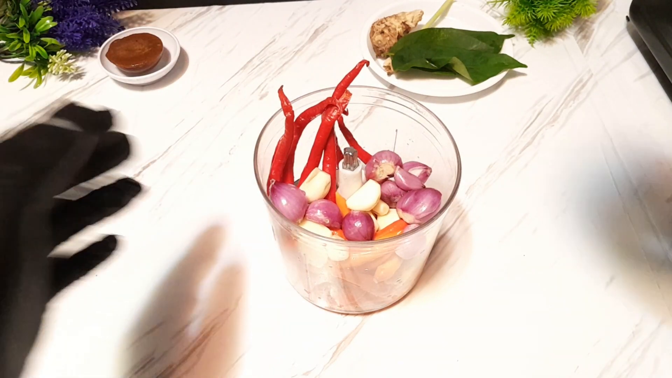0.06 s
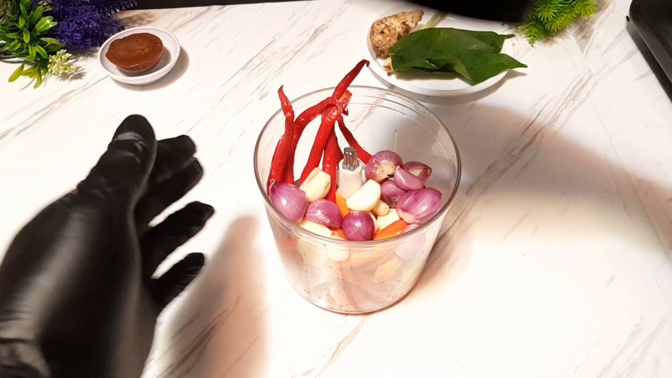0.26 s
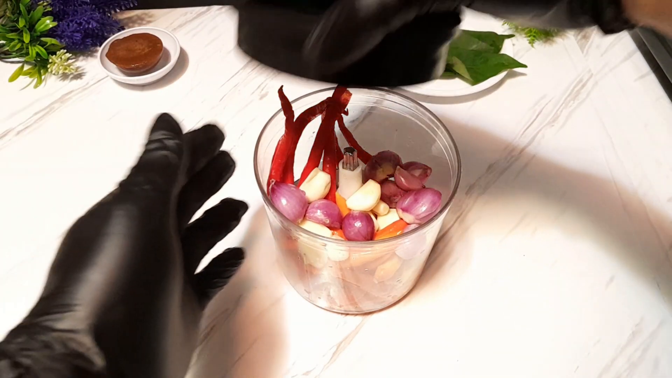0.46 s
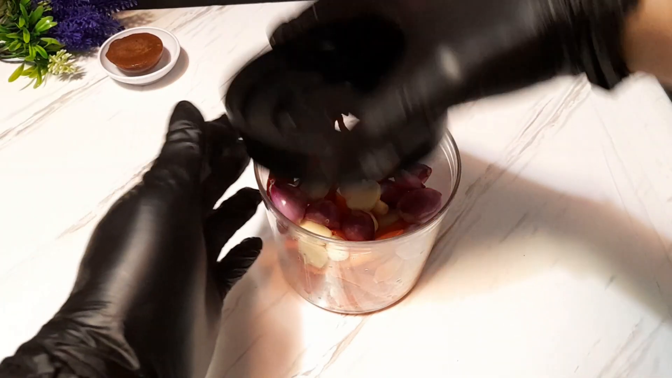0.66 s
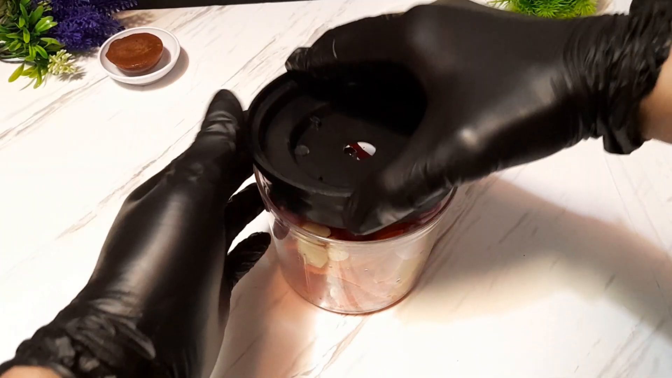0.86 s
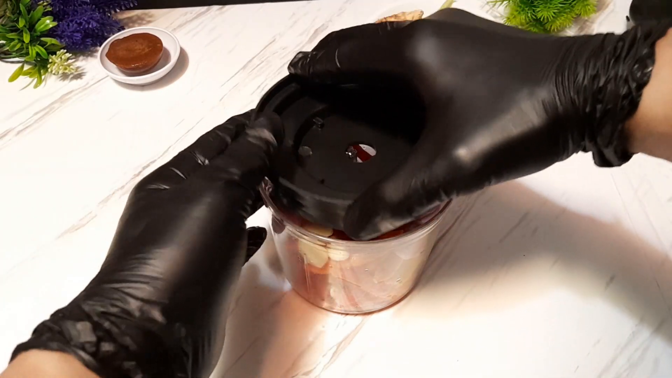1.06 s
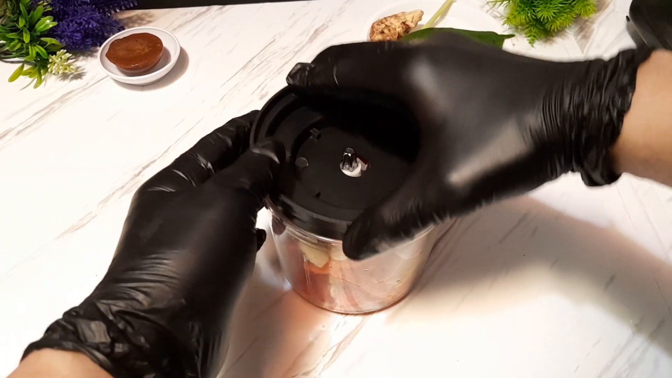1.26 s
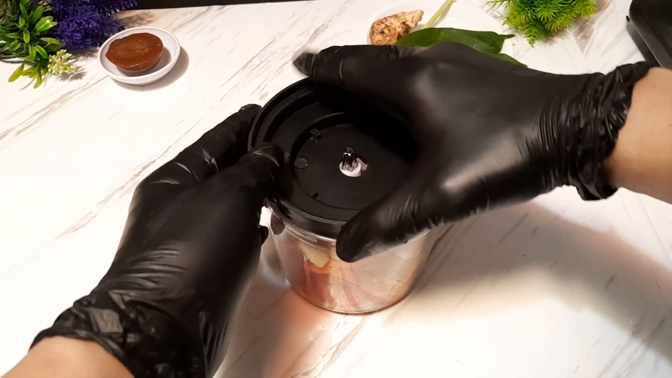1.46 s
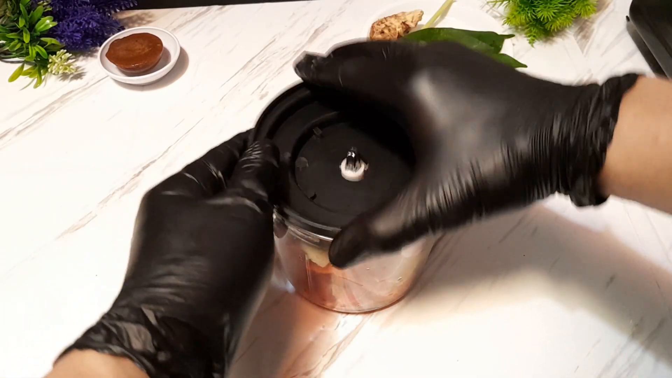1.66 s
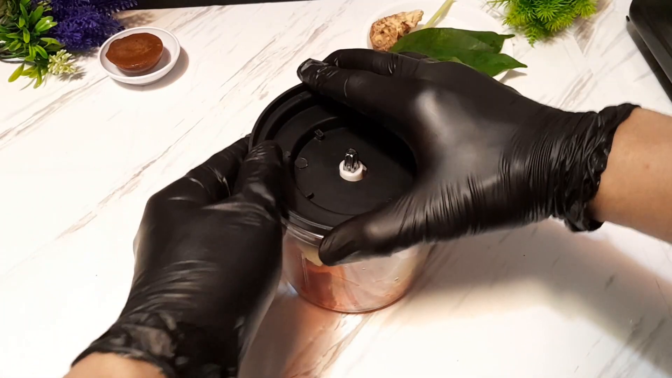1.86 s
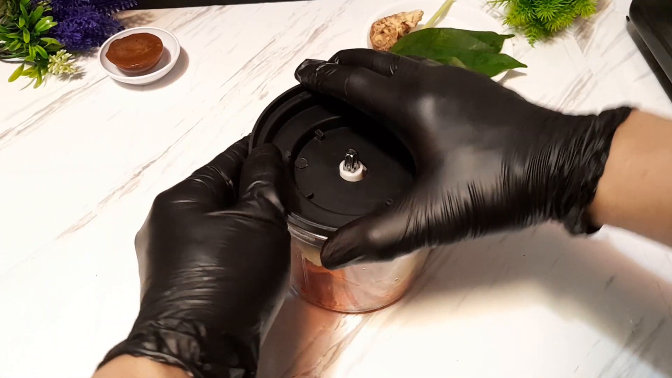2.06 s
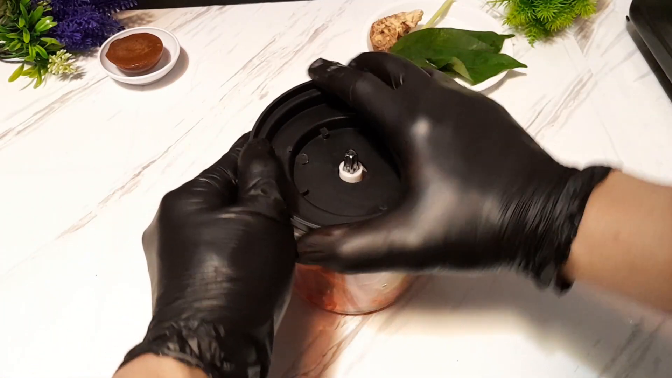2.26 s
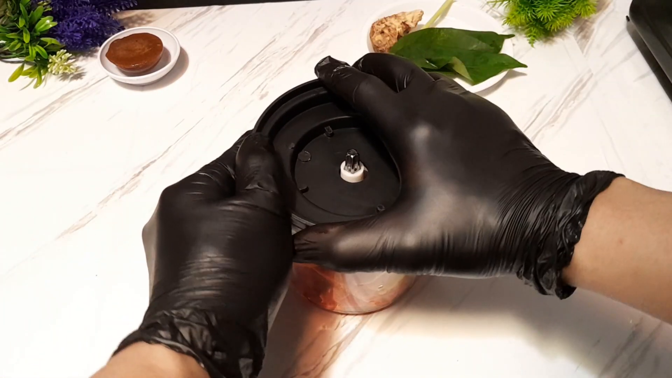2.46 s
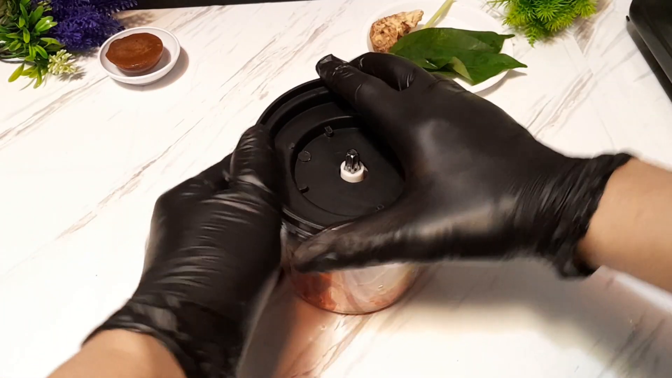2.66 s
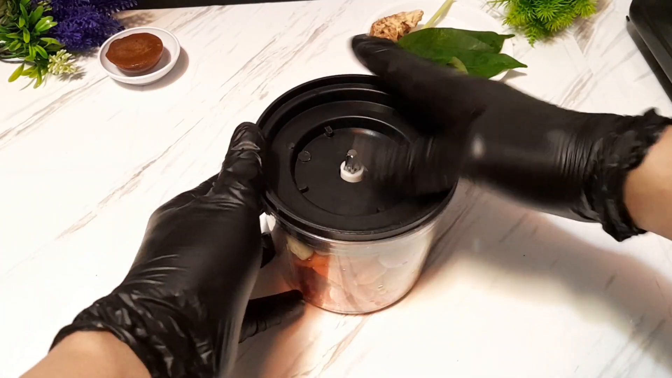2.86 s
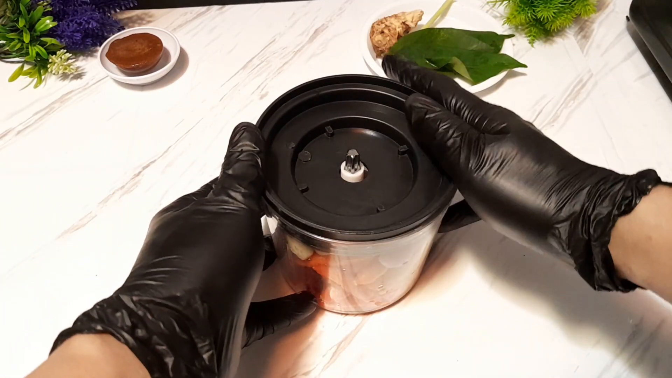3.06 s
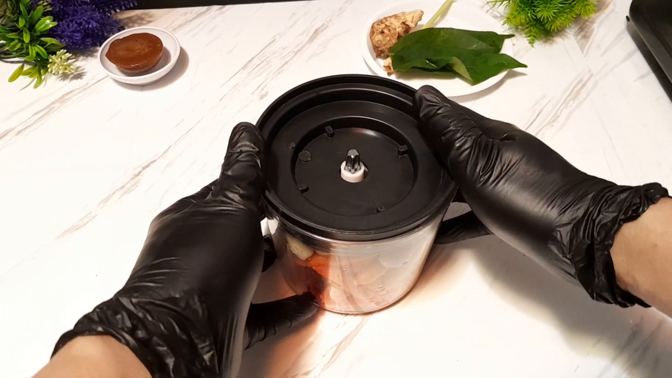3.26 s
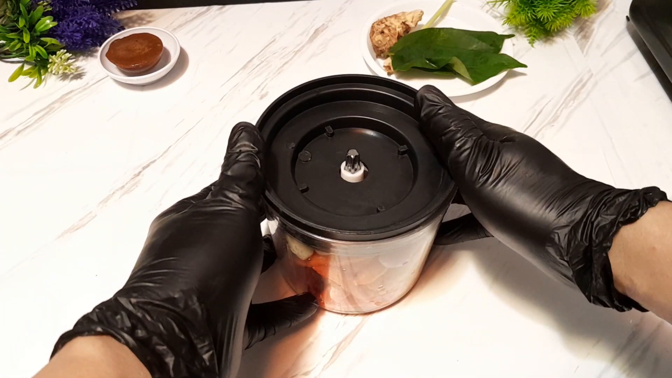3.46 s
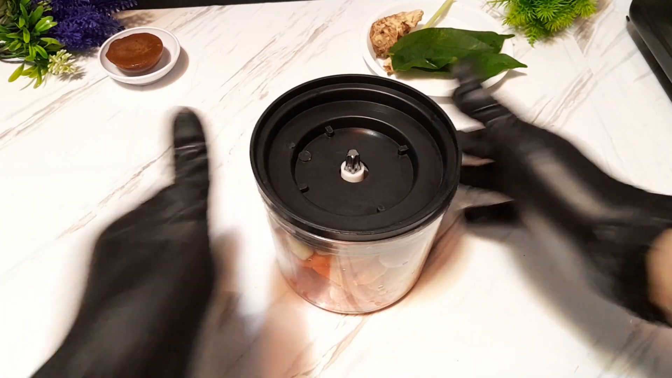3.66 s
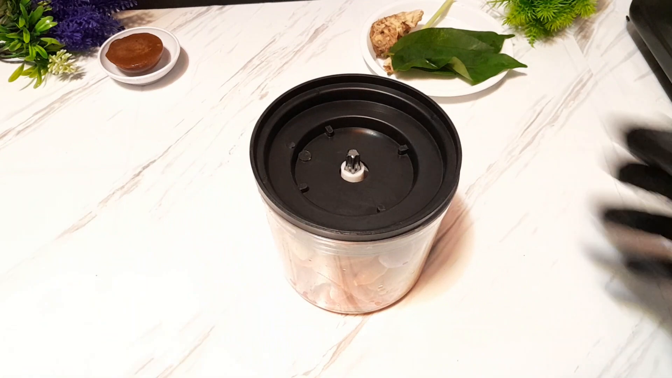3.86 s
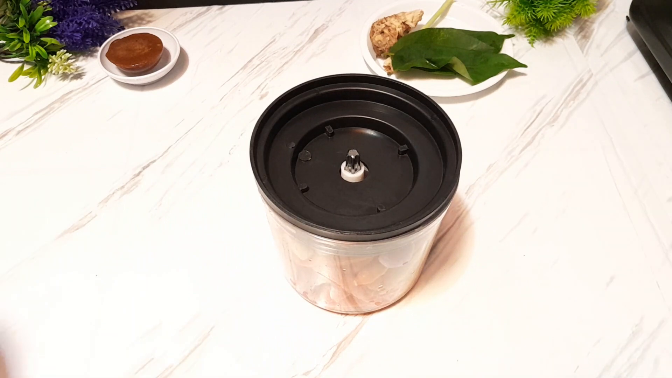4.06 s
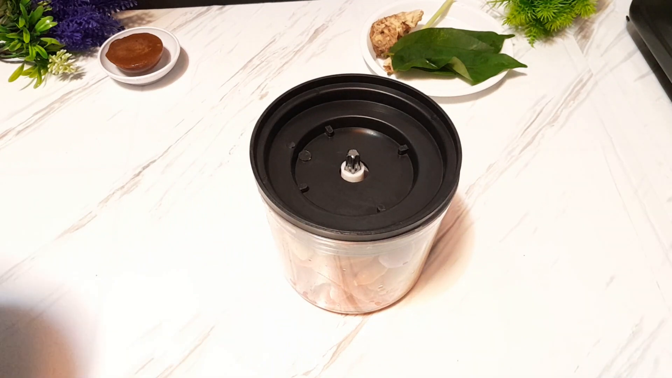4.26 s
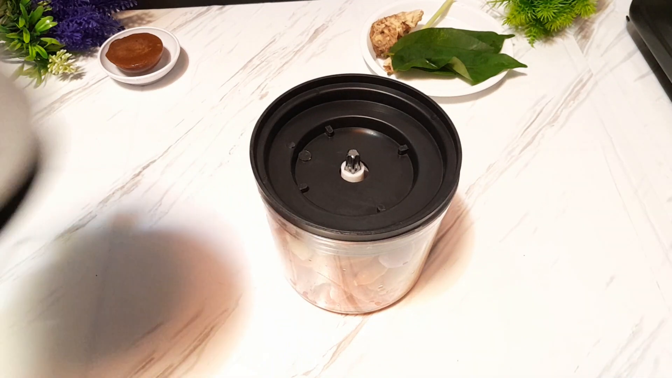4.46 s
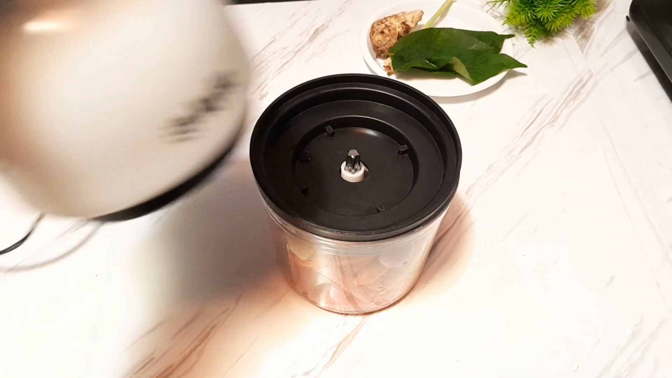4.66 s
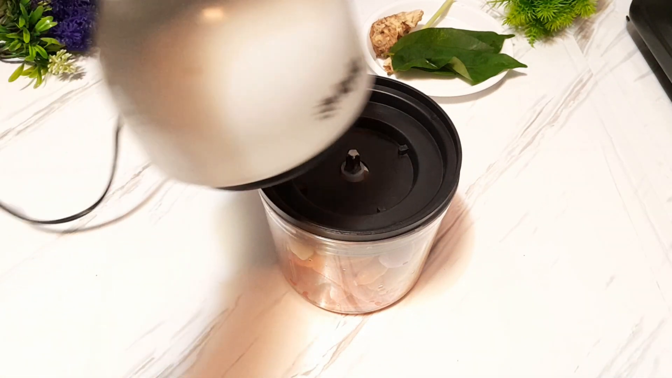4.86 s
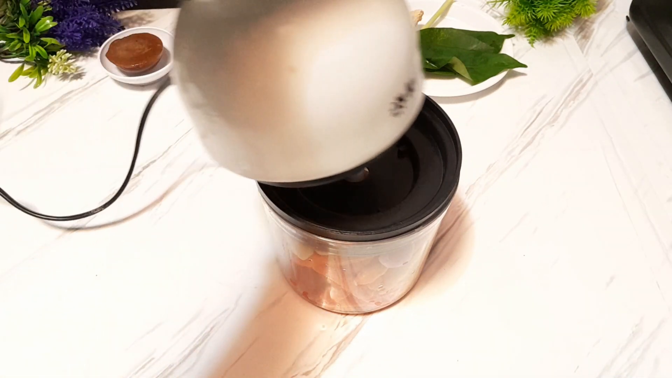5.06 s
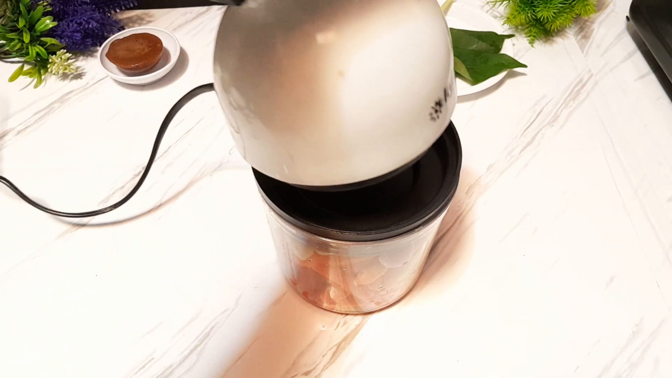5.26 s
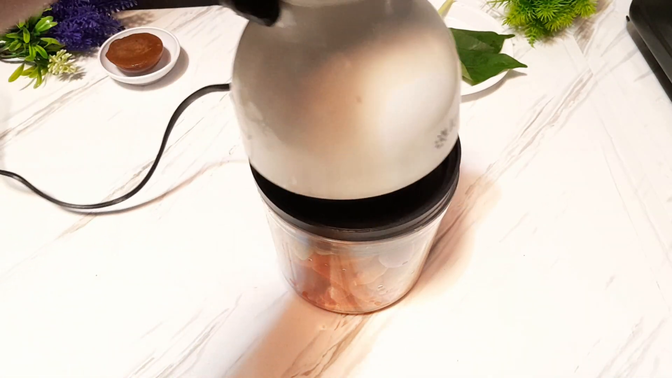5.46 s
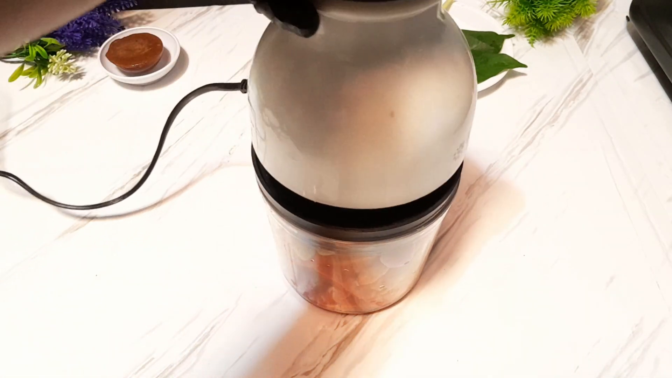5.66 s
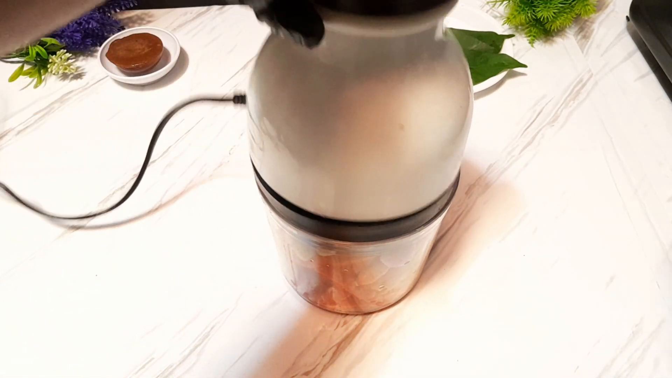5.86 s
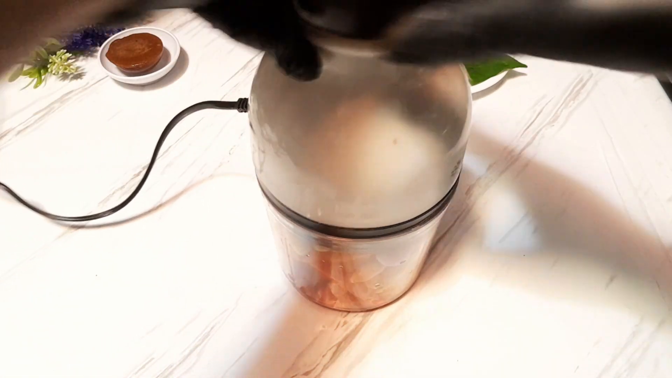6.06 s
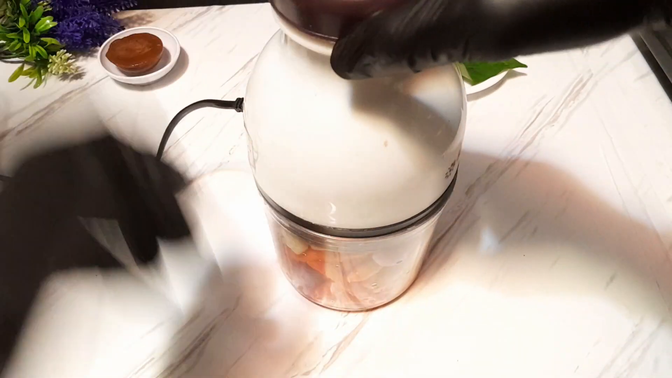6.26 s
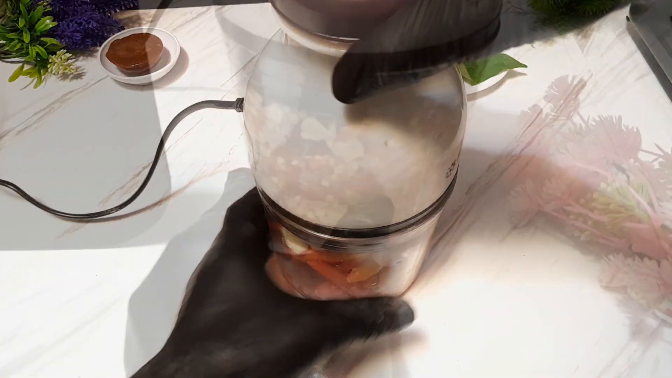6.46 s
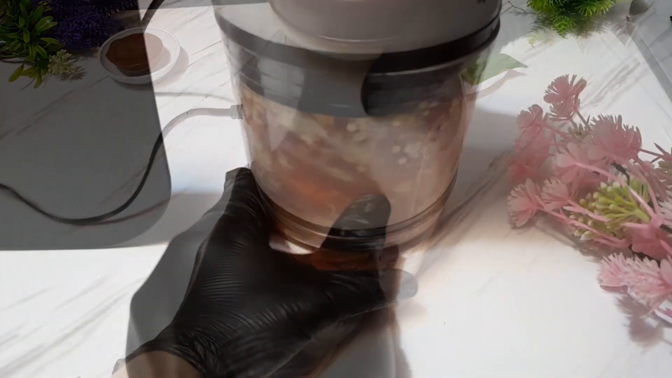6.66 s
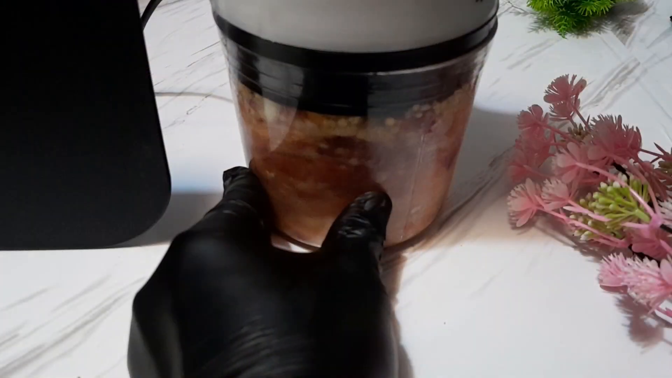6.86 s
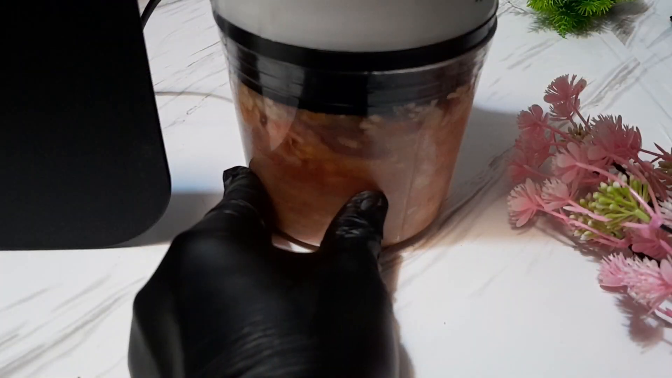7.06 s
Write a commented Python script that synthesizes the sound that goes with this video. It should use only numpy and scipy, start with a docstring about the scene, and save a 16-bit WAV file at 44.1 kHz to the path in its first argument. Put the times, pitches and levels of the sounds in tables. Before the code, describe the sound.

A faint hiss and low rumble fill a hard-walled kitchen. From about 1 second, a plastic lid knocks and rattles onto a small chopper bowl, close by, with the loudest hollow clack at around 1.7 seconds. Each knock has a short echo. Between 2 and 4.4 seconds there are only light taps and the soft rubbing and squeaking of rubber gloves. At about 4.5 seconds two sharp knocks come with a brief scrape, a squeak and a slight metallic jingle. The motor unit is fitted with firm plastic clacks at about 5.4 and 5.9 seconds, followed by small taps and more glove rubbing. At about 6.6 seconds another clack sounds and the electric motor starts, its whine rising quickly to a high pitch while the blades throw vegetable pieces against the bowl in a loud, dense rattle. This runs until the end, at around 7 seconds.

```python
"""Plastic knocks and rattles as a gloved cook presses the lid on a small chopper bowl and fits the motor.
Each knock rings the plastic walls and the air inside. Gloves rub and squeak, and a bit of metal jingles.
Near the end the motor whines up to speed and the blades throw food against the bowl.
A hard-walled kitchen echoes the knocks and jingles, over a faint hiss and a low rumble."""
import sys
import numpy as np
from scipy import signal
from scipy.fft import rfft, irfft
from scipy.io import wavfile
from scipy.ndimage import uniform_filter1d

SR = 44100
rng = np.random.default_rng(int(sys.argv[2]) if len(sys.argv) > 2 else 0)


def waveform_to_disk(signal):
    """Save audio, clipped to [-1, 1], as 16-bit WAV at the path in sys.argv[1]."""
    frames = np.transpose(np.atleast_2d(signal))
    scaled = np.clip(frames, -1, 1) * 32767
    samples = np.round(scaled).astype(np.int16)
    wavfile.write(sys.argv[1], SR, samples)


N = 313551
T = np.arange(N) / SR

# Each row: start in seconds, level in dB, spot hit, hollow pitch in Hz, extra boom in dB, # hardness in dB,
# base ring time in seconds.
KNOCKS = [(0.915, -47.5, "whole", 620, 15, -12, 0.05), (0.989, -16, "tab", 624, -3, 5.5, 0.038),
          (1.061, -13.5, "tab", 494, 6, -8, 0.028), (1.072, -22, "lid", 497, -8, 2.5, 0.027),
          (1.125, -20, "bowl", 495, 4, -4, 0.047), (1.159, -20.5, "lid", 515, 4.5, -18, 0.047),
          (1.182, -21.5, "whole", 437, -1.5, -31, 0.037), (1.279, -6, "lid", 363, -2.5, -9, 0.02),
          (1.441, -18.5, "bowl", 368, -3, -13, 0.033), (1.532, -31.5, "bowl", 405, 5, 2, 0.032),
          (1.675, -4, "whole", 393, 0, 7.5, 0.042), (1.689, 0.5, "whole", 529, -0.5, -13, 0.021),
          (2.256, -29, "whole", 218, 1, -1, 0.018), (2.284, -27.5, "edge", 300, 2, 0.5, 0.017),
          (2.487, -36, "bowl", 420, 3.5, -8, 0.029), (2.592, -34.5, "edge", 380, 0, 3, 0.021),
          (2.612, -32.5, "whole", 382, -3, 2, 0.021), (2.649, -36.5, "lid", 337, 11, -2, 0.016),
          (2.846, -26, "edge", 220, 3, 2, 0.019), (2.944, -28, "edge", 360, -5, -4, .047),
          (2.973, -25.5, "edge", 216, 9.5, -7, 0.057), (3.041, -21, "edge", 359, -8, 1, 0.023),
          (4.098, -39, "edge", 391, 16.5, 6, 0.079), (4.479, -7, "rim", 305, -4, 3.5, 0.018),
          (4.518, -6, "rim", 351, -1, 6, 0.033), (5.246, -44.5, "rim", 246, 20, -18, 0.047),
          (5.338, -7, "bowl", 338, -3, -3, 0.016), (5.386, -27.5, "bowl", 365, 11, 5, 0.03),
          (5.402, -3, "whole", 342, -0.5, 3, 0.022), (5.522, -17.5, "whole", 360, -3, -2, 0.026),
          (5.599, -30.5, "bowl", 272, 11, -6, 0.014), (5.619, -20, "bowl", 358, 3, -16, 0.04),
          (5.745, -19.5, "tab", 380, -6, -4.5, 0.013), (5.867, 1.5, "bowl", 349, 0.5, 6.5, 0.027),
          (5.905, -17, "bowl", 356, 4, -10, 0.03), (6.111, -26.5, "bowl", 216, 11.5, -3, .026),
          (6.149, -27, "bowl", 317, 7, -4, 0.019), (6.451, -37.5, "rim", 280, -3, 5, 0.032),
          (6.471, -25.5, "rim", 252, 1, -21, 0.021), (6.497, -24.5, "rim", 215, 0, -16, 0.015),
          (6.572, -12.5, "rim", 364, 1, 13.5, 0.032), (6.583, -1.5, "whole", 483, -6, -13, 0.03)]
# What each spot sets off. Each row: hollow, wall, lid, rim, crack, snap and left over right, all in dB.
SPOTS = {"bowl": (-8, -23, -20.5, -19.5, -27, -26, 6), "lid": (-11.5, -24, -5.5, -16, -20.5, -39, 13),
         "rim": (-18.5, -21.5, -17.5, -7, -10.5, -30, 7.5),
         "edge": (-19.5, -21.5, -27, -21.5, -12, -18.5, 6.5), "tab": (-13.5, -28, -46, -17, -15.5, -22, 8),
         "whole": (-7, -8.5, -14.5, -14, -15.5, -25.5, 8.5)}
PART_HZ = [400, 720, 1150, 1700, 3500, 9000]  # where those six parts of a knock sit, hollow to snap
# Tones of the lid and bowl. Each row: pitch in Hz, level in dB, multiple of the base ring time.
PLASTIC_TONES = [(628, -8.5, 1.6), (772, -4.5, 1.1), (907, -3.5, 1.2), (1108.4, 0.5, 1.5), (1247, 1, .9),
                 (1524, -3.5, 1.2), (1714, -1.5, 1.2), (1875, -6.5, 1.1), (2185, -17.5, .7)]
# Tones of the metal part. Each row: pitch in Hz, level in dB, seconds to fade by 60 dB.
METAL_TONES = [(660, 11, 0.044), (1331, 11, 0.087), (2203, 2.5, 0.067), (4690, -4.5, 0.053),
               (5500, 0, 0.03), (7000, -7.5, 0.096), (9400, -2, 0.16), (10760, -16, 0.12),
               (12900, -9.5, 0.0713), (14000, -5, 0.052), (16100, -6, .03)]
# Each row: start in seconds, shaking time in seconds, level in dB, treble tilt in dB per octave.
JINGLES = [(4.422, 0.1, -36, 2), (6.101, 0.089, -64.5, -17)]
# Tones of the motor's shaft and contacts. Each row: multiple of its pitch, width in Hz, level in dB.
MOTOR_TONES = [(1 / 12, 40, -10), (1, 170, 0), (2, 350, -9)]
# Tones the food rings in the bowl. Each row: pitch in Hz, width in Hz, level in dB.
BOWL_TONES = [(265, 156, 4.5), (488, 170, 1), (703, 18, -7), (906, 125, 6.5), (1364, 38, -7.5),
              (1656, 76, -5)]
# Sliding strokes. Each row: start, length and time to grip in seconds, then fizz, swish and scrape in dB.
RUBS = [(0.977, 0.26, .01, -68, -54, -70), (1.282, 0.14, 0.024, -51.5, -66.5, -63.5),
        (1.437, 0.096, .01, -53.5, -60, -74.5), (1.527, 0.14, 0.023, -55.5, -67, -65.5),
        (2.126, 0.062, 0.016, -49.5, -59, -58.5), (2.142, 0.19, 0.13, -55, -58, -49.5),
        (2.583, 0.29, 0.086, -53.5, -57.5, -63), (2.77, 0.16, 0.09, -44, -45.5, -54.5),
        (2.928, .11, 0.018, -47.5, -43.5, -53), (3.068, .14, 0.069, -52.5, -50, -57.5),
        (3.3, 0.36, 0.053, -63.5, -67, -76), (3.584, 0.28, .02, -59.5, -73, -77),
        (3.899, 0.076, 0.051, -47.5, -58.5, -66.5), (3.976, 0.094, 0.011, -42, -54.5, -65.5),
        (4.098, 0.12, 0.0046, -58, -55, -61), (4.187, 0.12, .05, -52.5, -56, -64),
        (4.306, 0.19, 0.048, -53.5, -55.5, -66), (4.416, 0.077, 0.036, -50.5, -48, -56.5),
        (4.48, .04, .01, -55, -44.5, -40.5), (4.516, 0.091, 0.0091, -53.5, -40.5, -30),
        (4.617, 0.16, .05, -59, -58, -58), (5.073, 0.28, 0.007, -59, -67.5, -74),
        (5.499, 0.077, .01, -50.5, -57, -43), (5.612, 0.066, .01, -48, -62, -51),
        (5.724, 0.27, 0.17, -50, -53.5, -48), (5.994, 0.099, .03, -51, -70, -75),
        (6.057, 0.12, 0.03, -45.5, -60, -64), (6.18, 1, 0.041, -54, -62.5, -66),
        (6.304, 0.54, .06, -54.5, -60, -57)]
# Each row: start, length and time to grip in seconds, pitch in Hz, level in dB.
SQUEAKS = [(2.16, 0.16, 0.031, 2700, -58.5), (2.619, 0.22, .03, 1170, -60),
           (3.975, 0.076, .02, 1620, -52.5), (4.168, 0.083, 0.018, 1330, -58),
           (5.843, 0.028, .01, 1900, -44), (4.522, .1, .01, 1810, -33.5), (6.317, .09, 0.02, 1400, -53.5),
           (6.33, .07, .03, 3220, -59), (6.454, 0.088, .01, 3060, -57.5)]
# The kitchen's echo. Each row: frequency in Hz, seconds to fade by 60 dB.
ECHO_TIMES = [(150, 0.23), (400, 0.37), (1000, 0.34), (2000, 0.35), (4000, 0.36), (8000, 0.31),
              (14000, 0.26)]
# The counter being handled. Each row: time in seconds, deep rumble in dB, boxy rumble in dB.
RUMBLE_LEVELS = [(0.0, -50.5, -56.5), (0.82, -51.5, -55.5), (1.18, -46.5, -49.5), (1.75, -48.5, -44),
                 (1.88, -48, -51.5), (2.28, -50, -54.5), (3.23, -50, -47), (3.68, -49.5, -52.5),
                 (3.9, -48, -56), (4.47, -49, -47.5), (4.82, -52, -56.5), (5.31, -51.5, -52.5),
                 (5.47, -46.5, -44.5), (6.09, -47, -44.5), (6.31, -47, -49.5), (6.55, -48.5, -48)]
# The tone colour of each noise. Each row: frequency in Hz, relative level in dB.
CHOP_COLOUR = [(24, -43), (40, -24), (130, -8.5), (268, -6.5), (611, -8), (728, 3), (867, -10.5),
               (1330, -5), (1880, -12.5), (2950, -11), (3270, -11.5), (3520, -12.5), (9570, -26),
               (13900, -27), (15800, -27.5)]
RUBBER_COLOUR = [(1300, -9), (2200, -5), (3600, -3), (7000, 1), (10000, -5.5), (14500, -2), (16500, -22)]
SCRAPE_COLOUR = [(410, -59), (700, -23), (834, -6), (911, -11), (1300, -6), (2600, -22), (3380, -57),
                 (5720, -120)]
HISS_COLOUR = [(290, -34.5), (500, -7.5), (805, -7), (891, -8), (1730, -12.5), (2090, -11.5), (2280, -12.5),
               (4900, -14), (7560, -7.5), (15800, -16)]
RUMBLE_COLOUR = [(12, -48), (20, -22.5), (37, -9), (133, 0), (172, -9.5), (201, -10.5), (268, -11),
                 (335, -8.5), (393, -7), (426, -16), (900, -36), (1170, -58), (1980, -120)]
# How alike left and right are. Each row: frequency in Hz, likeness (1 is the same, 0 is unrelated).
NOISE_LIKENESS = [(60, 0.51), (180, 0.9), (550, 0.34), (1650, 0.067), (4970, -0.031), (15000, 0.064)]
CHOP_LIKENESS = [(60, 0.58), (180, 0.96), (550, 0.76), (1650, 0.21), (4970, 0.065), (15000, 0.02)]
ECHO_LIKENESS = [(150, 0.81), (500, 1), (1200, 0.16), (4000, .05)]
# Which way the chopping leans. Each row: frequency in Hz, left over right in dB.
CHOP_LEAN = [(60, -5), (180, 1), (550, 3), (1650, 5.5), (4970, 1), (15000, 2.5)]

MOTOR_START_S, SPIN_UP_S, START_HZ, TOP_HZ = 6.582, 0.0873, 810, 3020
CHOP_DB, WHINE_DB, STRAIN_DB = -15, -24.5, 10
LET_GO_S, EASE_DB = 0.04, -4.5


def knock(parts_db, hollow_hz, ring_s, pan_db):
    """The contact clicks and rattles, the air booms, the walls ring. Gives left, right and room feed."""
    luck = rng.standard_normal(8000)
    t, hz = np.arange(len(luck)) / SR, np.fft.rfftfreq(len(luck), 1 / SR)
    shape = list(zip(PART_HZ, parts_db))
    boom = np.sin(2 * np.pi * hollow_hz * t) + gain_of(-7) * np.sin(2 * np.pi * .7 * hollow_hz * t)
    hollow = gain_of(parts_db[0] + 5.5 - 60 * t / (1.51 * ring_s)) * boom * fade_in(t, 0.002)
    detune = 1 + .018 * luck  # no two knocks ring quite alike
    walls = sum(gain_of(db + value_at(shape, f) - 60 * t / (stretch * ring_s))
                * np.sin(2 * np.pi * f * detune[k] * t + 2 * np.pi * luck[-k])
                for k, (f, db, stretch) in enumerate(PLASTIC_TONES)) * fade_in(t, 0.0009) ** 2
    band = hz ** 2 / (hz ** 2 + 220 ** 2) / (1 + (hz / 11000) ** 2)
    colour = gain_of(value_at(shape, hz)) / np.sqrt(hz / 1000 + .2) * band
    rattle = irfft(rfft(luck) * colour)
    rattle *= gain_of(8.5 - 60 * t / (1.42 * ring_s)) * fade_in(t, 0.00018) ** 2
    click = irfft(1j * colour * np.exp(-2j * np.pi * hz * 0.002)) * (t < .006)  # a pulse 2 ms in
    sides_db = np.array([[.5], [-.5]]) * pan_db
    near = gain_of(sides_db) * (walls + rattle + gain_of(14) * click) + gain_of(.4 * sides_db) * hollow
    far = gain_of(-2.5) * hollow + walls + gain_of(29.5) * click  # the sharp click carries furthest
    return np.vstack([near, far])


def plastic_knocks():
    """Where a knock lands decides what sounds; a harder one has more crack and snap."""
    out = np.zeros((3, N))
    for start, db, spot, hollow_hz, boom_db, hard_db, ring_s in KNOCKS:
        hollow_db, *body_db, crack_db, snap_db, pan_db = SPOTS[spot]
        parts_db = [hollow_db + boom_db, *body_db, crack_db + hard_db, snap_db + hard_db]
        add(out, start, gain_of(db) * knock(parts_db, hollow_hz, ring_s, pan_db))
    return out


def chopper():
    """Blades throw a hail of food that rings the bowl; the motor whines louder while gaining speed."""
    start = round(MOTOR_START_S * SR)
    t = T[:N - start]
    strain = np.exp(-t / SPIN_UP_S)
    hz = TOP_HZ - (TOP_HZ - START_HZ) * strain
    hail = grains(len(t), per_s=2500, spread_db=3.5, wash=0.74)
    buzz = rng.standard_normal((2, len(t)))
    whine = sum(gain_of(db) * noisy_tone(buzz, k * hz, width) for k, width, db in MOTOR_TONES)
    wall = coloured(hail, CHOP_COLOUR, CHOP_LIKENESS, lean=CHOP_LEAN)
    rings = sum(gain_of(db) * evened(resonate(wall, f, width)) for f, width, db in BOWL_TONES)
    lumps = evened(uniform_filter1d(rng.standard_normal(len(t)), 900))  # food comes round unevenly
    big_pieces = grains(len(t), per_s=70, spread_db=3, wash=0)[0]
    thuds = noisy_tone(big_pieces, hz=300, width_hz=210)
    food = gain_of(CHOP_DB + 0.63 * lumps) * (wall + gain_of(-13) * rings + gain_of(-12.5) * thuds)
    motor = gain_of(WHINE_DB + STRAIN_DB * strain) * whine
    out = np.zeros((2, N))
    out[:, start:] = fade_in(t, 0.0014) * (food + motor)
    return out


def stroke(length, grip_s):
    """The pressure of a sliding finger or part: it grips, eases and lets go."""
    t = np.arange(0, length + LET_GO_S, 1 / SR)
    rise = np.sin(np.pi / 2 * np.minimum(t / grip_s, 1)) ** 2
    release = np.clip((length + LET_GO_S - t) / (2 * LET_GO_S), 0, 1)
    return rise * gain_of(EASE_DB * t / length) * release


def rubbing():
    """Rubber slips in tiny jerks that fizz and swish; the bowl wall adds a duller scrape."""
    slips = grains(N, per_s=900, spread_db=5.3, wash=1.9)
    fizz = coloured(slips, RUBBER_COLOUR, NOISE_LIKENESS, lo_hz=5670)
    swish = coloured(slips, RUBBER_COLOUR, NOISE_LIKENESS, hi_hz=5460)
    scrape = coloured(grains(N, per_s=450, spread_db=3, wash=0.98), SCRAPE_COLOUR, NOISE_LIKENESS)
    power = np.zeros((3, N))
    for start, length, grip_s, *db in RUBS:
        add(power, start, (gain_of(db)[:, None] * stroke(length, grip_s)) ** 2)
    return sum(gain * layer for gain, layer in zip(np.sqrt(power), (fizz, swish, scrape)))


def squeaks():
    """Rubber sticks and chatters around one pitch."""
    out = np.zeros((2, N))
    for start, length, grip_s, hz, db in SQUEAKS:
        press = stroke(length, grip_s)
        tone = noisy_tone(rng.standard_normal((2, SR // 2)), hz, width_hz=200)
        add(out, start, gain_of(db) * press * tone[:, -len(press):])
    return out


def metal_jingles():
    """A small metal part on the left rings as it is shaken. Gives left, right and room feed."""
    out, t = np.zeros((3, N)), T[:12000]
    for start, length, db, tilt_db in JINGLES:
        ring = sum(gain_of(tone_db + tilt_db * np.log2(f / 1290) - 60 * t / fade_s)
                   * np.sin(2 * np.pi * f * t) for f, tone_db, fade_s in METAL_TONES)
        shaking = rng.standard_normal(len(t)) * np.exp(-(t / length) ** 2) / np.sqrt(length * SR)
        add(out, start, gain_of([[db + 4], [db - 4], [db - 8]]) * signal.fftconvolve(shaking, ring))
    return out


def kitchen_echo(sound):
    """Hard walls send back many echoes; each frequency band fades at its own speed."""
    echoes = np.zeros((2, SR // 2))
    slots = np.arange(400, SR // 2 - 20, 20)
    arrivals = slots + rng.integers(0, 20, (2, len(slots)))
    np.put_along_axis(echoes, arrivals, rng.choice([-1., 1.], arrivals.shape), 1)
    hz, t, bands = signal.stft(echoes, SR, nperseg=256)
    alike = value_at(ECHO_LIKENESS, hz)[:, None]
    bands[1] = alike * bands[0] + np.sqrt(1 - alike ** 2) * bands[1]
    fade = gain_of(-60 * t / value_at(ECHO_TIMES, hz)[:, None])
    tail = signal.istft(bands * fade, SR, nperseg=256)[1]
    return signal.fftconvolve(sound[None], tail / np.linalg.norm(tail[0]), axes=1)[:, :N]


def hiss_and_rumble():
    """Faint hiss, with a deep and a boxy rumble that swell as the counter is handled."""
    times, *levels = np.transpose(RUMBLE_LEVELS)
    deep_db, boxy_db = [np.interp(T, times, db) for db in levels]
    hiss, deep, boxy = rng.standard_normal((3, 2, N))
    return (gain_of(-60) * coloured(hiss, HISS_COLOUR, NOISE_LIKENESS)
            + gain_of(deep_db + 2.5) * coloured(deep, RUMBLE_COLOUR, NOISE_LIKENESS, hi_hz=190)
            + gain_of(boxy_db) * coloured(boxy, RUMBLE_COLOUR, NOISE_LIKENESS, lo_hz=192.4))


def gain_of(db):
    return 10 ** (np.asarray(db) / 20)


def fade_in(t, rise_s):
    return 1 - np.exp(-t / rise_s)


def evened(x):
    """Scales a sound to an average power of 1."""
    return x / np.sqrt(np.mean(x ** 2) + 1e-20)


def value_at(points, hz):
    """Reads between the rows of a frequency table."""
    f, value = np.transpose(points)
    return np.interp(np.log(hz + 1), np.log(f + 1), value)


def add(mix, start_s, sound):
    part = mix[..., round(start_s * SR):][..., :sound.shape[-1]]
    part += sound[..., :part.shape[-1]]


def resonate(x, hz, width_hz):
    """Keeps what lies near a pitch: shifts that pitch to zero, smooths, and shifts back."""
    turn = np.exp(2j * np.pi * np.cumsum(hz * np.ones(x.shape[-1])) / SR)
    decay = np.exp(-np.pi * width_hz / SR)
    return 2 * (turn * signal.lfilter([1 - decay], [1, -decay], x / turn)).real


def noisy_tone(noise, hz, width_hz):
    """Two resonances in a row narrow noise to a rough tone."""
    return evened(resonate(resonate(noise, hz, width_hz), hz, width_hz))


def coloured(pair, colour, likeness, lo_hz=0, hi_hz=SR, lean=((1, 0), (2, 0))):
    """Turns two unrelated noises into a left-right pair of given colour, likeness and balance."""
    hz = np.fft.rfftfreq(pair.shape[1], 1 / SR)
    a, b = rfft(pair)
    alike, side = value_at(likeness, hz), gain_of(value_at(lean, hz) / 2)
    stereo = np.array([a * side, (alike * a + np.sqrt(1 - alike ** 2) * b) / side])
    band = 1 / (1 + (lo_hz / (hz + 1)) ** 4) / (1 + (hz / hi_hz) ** 4)
    return evened(irfft(stereo * gain_of(value_at(colour, hz)) * band, pair.shape[1]))


def grains(size, per_s, spread_db, wash):
    """Scattered clicks, a few of them large, over a wash of smooth noise."""
    strength = gain_of(spread_db * np.minimum(rng.exponential(1, (2, size)), 4))
    clicks = strength * (rng.random((2, size)) < per_s / SR) * rng.choice([-1., 1.], (2, size))
    return evened(clicks) + wash * rng.standard_normal((2, size))


def scene():
    """Mixes all the sources; only knocks and jingles feed the echo."""
    hits = plastic_knocks() + metal_jingles()
    near, echo = hits[:2], gain_of(-3) * kitchen_echo(hits[2])
    return near + echo + rubbing() + squeaks() + hiss_and_rumble() + chopper()


def record(dry):
    """A small microphone drops the deepest bass, softly squashes peaks and cuts the highest treble."""
    thin = signal.sosfilt(signal.butter(2, 42, "high", fs=SR, output="sos"), dry)
    squashed = 1.122 * np.tanh(thin / 1.028)
    treble_cut = signal.firwin(1023, 15900, window=("kaiser", 9), fs=SR)
    return signal.oaconvolve(squashed, treble_cut[None], "same")


dry = scene()
out = record(dry)
waveform_to_disk(out)
```